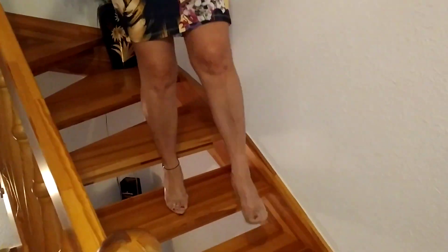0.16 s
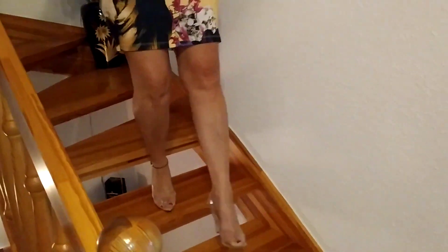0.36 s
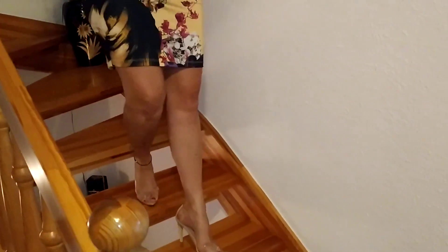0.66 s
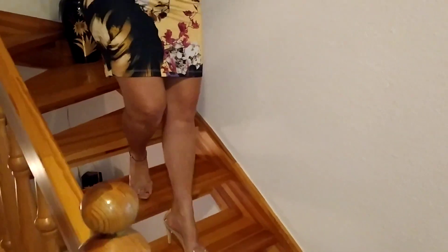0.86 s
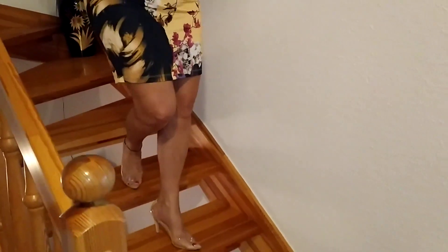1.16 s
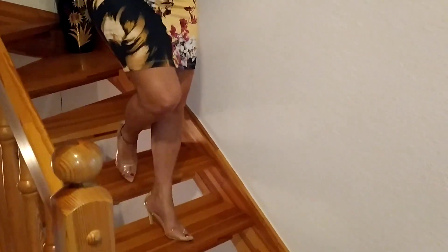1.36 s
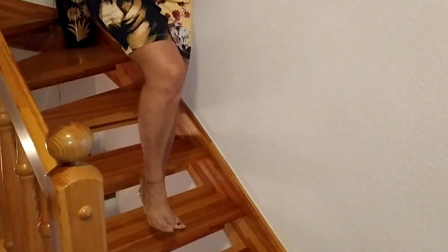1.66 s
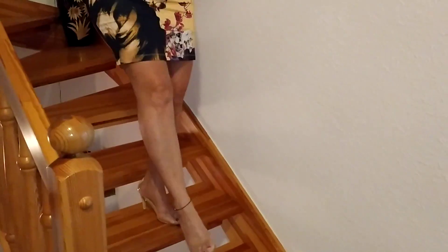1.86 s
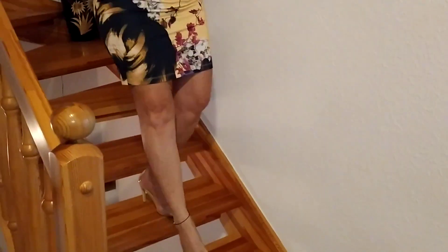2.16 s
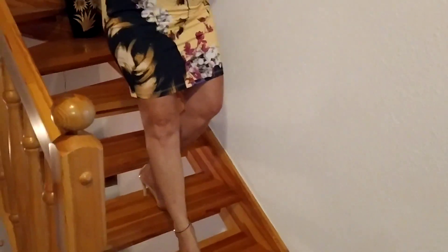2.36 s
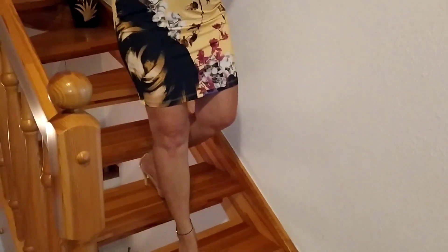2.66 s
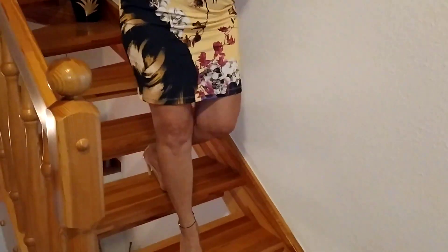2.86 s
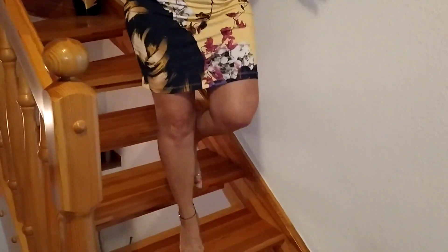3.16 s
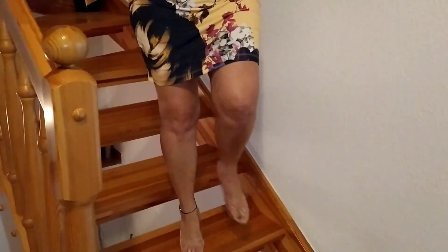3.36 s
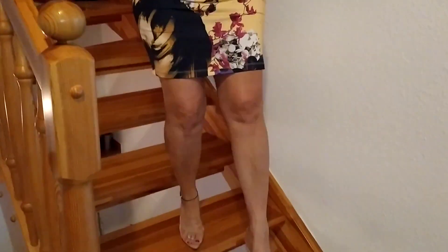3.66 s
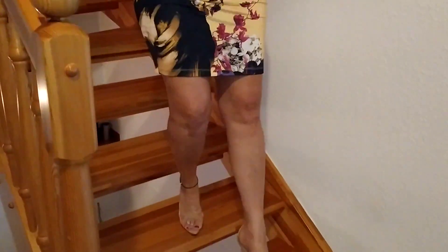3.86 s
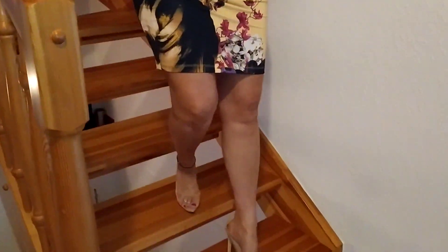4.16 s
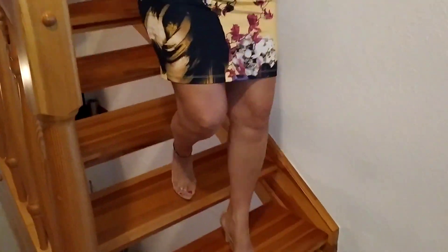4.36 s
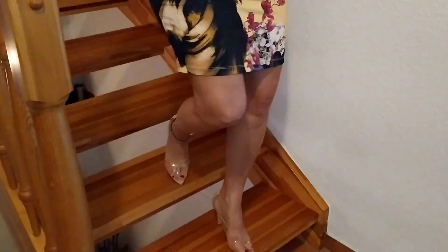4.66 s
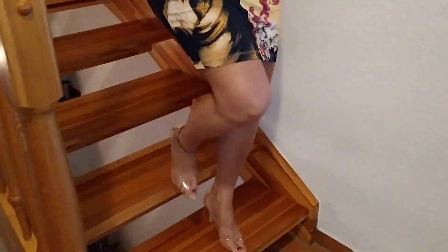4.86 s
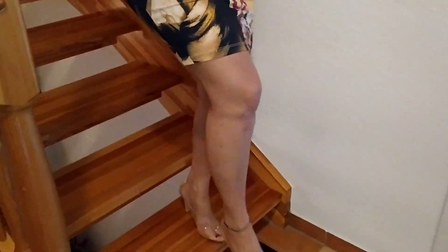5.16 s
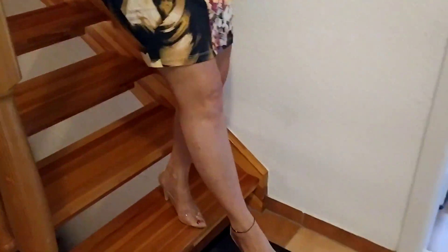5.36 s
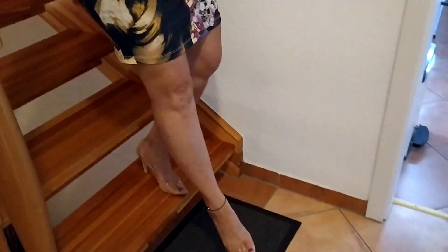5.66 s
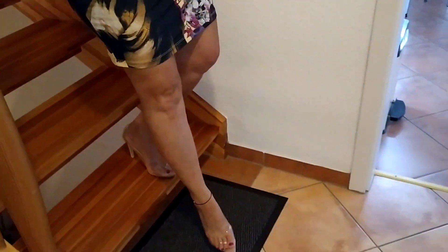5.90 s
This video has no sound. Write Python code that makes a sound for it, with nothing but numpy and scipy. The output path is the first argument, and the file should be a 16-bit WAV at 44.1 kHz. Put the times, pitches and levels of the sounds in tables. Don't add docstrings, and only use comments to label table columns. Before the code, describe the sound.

Inside a bare house stairwell, quiet microphone hiss and a wavering low rumble continue throughout, with faint cloth rustle and creaky handling. A soft finger thump at 0.25 s and slight strap scuffs lead to the first step around 0.97-1.05 s: a sole slap and hollow double heel knock on wood, with small rebounds and about half a second of echo. A light tick follows at 1.2 s, then a sharp finger pop on the left at 1.74 s. The second step, at 2.72 s, is a brighter slap and knock, with softer contacts until 2.94 s. Faint taps and handling pops pass between 3.1 and 4.2 s. The third step is loudest, a sharp slap at 4.39 s and hard heel clack at 4.44 s, rattling briefly as the tread rings. Only faint touches follow around 5.1 s, before close left-side finger pops crowd 5.64-5.95 s.

```python
import sys
import numpy as np
from scipy import signal
from scipy.fft import rfft, irfft
from scipy.io import wavfile
from scipy.ndimage import uniform_filter1d

SR = 44100
rng = np.random.default_rng(int(sys.argv[2]) if len(sys.argv) > 2 else 0)


def wav_out(sig):
    wavfile.write(sys.argv[1], SR, np.round(np.clip(np.atleast_2d(sig).T, -1, 1) * 32767).astype(np.int16))


def linear_from_db(decibels):
    return 10 ** (np.asarray(decibels, float) / 20)


N = 266011

# pitch_hz, level_db per Hz
HISS_SPECTRUM = [(53, -44), (90, -4.5), (136, -11.5), (410, -19.5), (532, -21), (1290, -24), (1540, -26.5),
                 (2090, -21.5), (2800, -24), (3300, -30), (4860, -29), (5410, -30.5), (10600, -30),
                 (16000, -36)]
# pitch_hz, likeness (-1 to 1)
HISS_LIKENESS = [(60, -0.38), (180, 0.55), (550, 0.73), (1650, 0.01), (4970, -0.01), (15000, -0.023)]
# centre_s, rise_db, length_s
SHUFFLE_SWELLS = [
    (.23, 0, 0.11),
    (1.25, 5, 0.26),
    (2.7, -5, 0.045),
    (2.85, 13, 0.1),
    (3.49, 0.5, 0.14),
    (4.2, 7.5, 0.26),
    (4.82, 4.5, 0.021),
    (5.16, 6, .06),
    (5.73, 6, 0.17),
]
# centre_s, rise_db, length_s
GRIP_SWELLS = [(.55, -4.5, .12), (.86, 7.5, 0.12), (1.1, -34, 0.033), (1.22, 12, .08), (2.4, 8, 0.36),
               (2.88, 16, 0.074), (3.3, -2, 0.33), (4.38, -11.5, 0.088), (4.57, 19, 0.15), (4.95, -3, 0.19),
               (6.03, -2, 0.059)]

# time_s, pitch_hz
HUM_PITCH = [(0, 60.6), (.43, 53.3), (.7, 58.1), (.9, 43.9), (1.1, 52.64), (1.9, 56.1), (2.6, 55.7),
             (3.07, 66.13), (5.3, 64.8), (6.03, 52.4)]
# centre_s, rise_db, length_s
HUM_SURGES = [(0, 15, 0.037), (.25, 4, 0.053), (.42, 4.5, 0.02), (.66, 2, 0.053), (.9, 12.5, 0.068),
              (1.15, 16.5, 0.063), (1.67, 4.5, 0.096), (1.9, 3.5, 0.19), (2.6, 4, 0.045),
              (2.79, 12.5, 0.025), (2.96, 8, 0.056), (3.4, 4.5, 0.31), (3.82, -7, 0.044), (4.0, 3.5, 0.044),
              (4.25, 3, 0.043), (4.44, 6, 0.07), (4.6, 1, 0.044), (4.82, 7, 0.047), (5.07, 5.5, 0.14),
              (5.55, 14.5, 0.071), (5.84, 6, 0.045), (6.03, 7, 0.032)]
# centre_s, left_minus_right_db, length_s
HUM_TILTS = [(0, -6, 0.03), (.33, 9, 0.084), (1.1, -4, 0.038), (1.35, 16, 0.087), (1.68, 2, 0.048),
             (2.24, 21, 0.045), (2.6, 13, 0.059), (3.9, 11, 0.033), (4.5, -9, 0.18), (5.5, -3, .1),
             (5.83, 2, 0.047)]

# start_s, level_db, contact_ms, after_push_ms, echo_db
STEP_BLOWS = [(.048, -66.5, 0.44, 4.2, -4), (.369, -56.5, 0.17, 9.4, -4), (.745, -48.5, 0.13, 11, -2),
              (0.963, -51, 0.26, 1.4, 2), (.977, -33.5, 0.033, 7.9, -4), (1.032, -26, 0.085, 7.5, 2.5),
              (1.0371, -25, 0.34, 1.7, -16.5), (2.725, -33, 0.055, 15, -2.5),
              (2.846, -42.5, 0.76, 6.5, -0.5), (2.858, -40, 0.18, 2.8, -10), (2.936, -45.5, 0.33, 5.5, 1.5),
              (3.147, -59.5, 0.063, 4.6, 7), (3.869, -55, 0.59, 3.1, -8), (3.98, -51, 0.04, 5.2, -2),
              (4.097, -51, 0.27, 7.4, 3.5), (4.345, -51, 0.06, 1.5, -2), (4.387, -27, 0.061, 15, -8.5),
              (4.4394, -22.5, 0.12, 6, 0.5), (4.4467, -22.5, 0.17, 7.1, -40), (5.095, -56, 0.4, 1.8, -7),
              (5.174, -62, 0.23, 9.9, 7)]
# start_s, level_db, contact_ms,
# after_push_ms, echo_db (unused, these stay dry)
AFTER_KNOCKS = [(1.0435, -27.5, 0.13, 3.6, 0), (2.729, -40, 1.9, 8.4, 0), (2.873, -43.5, 1., 6, 0),
                (4.4425, -21, 0.066, 5.7, 0), (4.4498, -28, 0.34, 3, 0), (4.469, -29, 0.46, 6.4, 0),
                (4.486, -31, 0.42, 6, 0), (5.2, -69, 0.17, 15, 0), (1.107, -39, .45, 18, 0),
                (1.18, -46.5, 0.29, 19, 0), (2.731, -35, 0.12, 5, 1), (2.7378, -39, 0.072, 2.5, 0),
                (4.512, -36, 0.42, 16, 0), (4.536, -33, .55, 18, 0)]
LANDING_CHANGES = [
    2.0,
    2.84,
    2.9,
    3.5,
    4.43,
    4.6,
]
# pitch_hz, width_hz, level_db
UPPER_TREAD = [(142, 97, -7), (212, 73, 1.5), (315, 18, -11), (441, 22, -1), (540, 67, -9.5),
               (613, 25, -10), (770, 75, -5.5), (956, 94, -5.5), (1150, 220, -5.5), (1440, 210, -13)]
MIDDLE_TREAD = [(136, 50, -8.5), (230, 71, -7), (290, 80, -16), (439, 37, -8.5), (642, 128, -2),
                (940, 105, 0.5), (1390, 300, 0.5), (1810, 300, 4), (2500, 400, -14)]
LOWER_TREAD = [(135, 24, -11), (226.7, 50, 3.5), (305, 34, -13), (438, 23, 1.5), (486, 46, 1),
               (640, 65, -3.5), (778, 40, -0.5), (900, 100, 1), (1164, 72, 3.5), (1484, 150, 6),
               (1732, 201, -27)]
# pitch_hz, width_hz, level_db
MIDDLE_TREAD_HEEL = [(140, 60, -10), (252, 84, 1), (340, 100, -3), (432, 40, -2.5), (610, 100, 6),
                     (760, 110, 1), (1000, 200, -10)]
LOWER_TREAD_HEEL = [(140, 28, -15), (239, 43, -4), (313, 31, -11.5), (354, 30, -11.5), (422, 26, -6.5),
                    (483, 61, 1), (620, 92, -4), (770, 95, 1), (900, 110, -17), (1118, 39, -9.5),
                    (1280, 87, -15), (1430, 84, -8), (1630, 100, -11), (2600, 600, -11)]

# pitch_hz, t60_s
STAIRWELL_T60 = [(100, 0.5), (400, 0.52), (1100, 0.48), (3000, 0.39), (8000, 0.47), (15000, 0.19)]
# pitch_hz, likeness (-1 to 1)
ECHO_LIKENESS = [(60, 1), (180, 0.99), (550, 0.75), (1650, 0.27), (4970, 0), (15000, 0.47)]

# start_s, level_db, pitch_hz, width_octaves, length_ms
SHOE_SLAPS = [(.742, -48, 2500, 1.5, 4.8), (0.9653, -32, 5000, 2.8, 0.66), (0.9728, -30.5, 1910, 1.96, 4.4),
              (1.03, -51, 845, 0.35, 5.1), (1.182, -31, 10700, 0.78, 1.9), (2.175, -50.5, 9000, 4.1, 10.2),
              (2.7245, -31, 2560, 0.25, 2.56), (2.724, -27, 5200, 2.4, 5.8), (2.937, -36, 2560, 1.7, 3.9),
              (3.147, -52.5, 2020, 1.3, 4.6), (3.981, -42.5, 4000, 2.1, 7.5),
              (4.097, -41.5, 2983, 2.4, 7.4), (4.2092, -39, 10500, 0.93, 3.6), (4.386, -18.5, 3000, 2.7, 2),
              (4.4396, -28, 2500, 0.35, 1.5), (4.4395, -35, 746, 0.17, 3), (4.604, -50.5, 6670, 0.69, 9.5),
              (5.17, -55.5, 850, 0.65, 23), (5.557, -51, 9000, 0.5, 2.7), (5.844, -38.5, 8150, 0.87, 2.9)]
# start_s, level_db, pitch_hz, width_octaves, length_ms
SHOE_SCUFFS = [(0.221, -48.5, 8300, 0.72, 19), (.29, -57, 9900, 0.51, 8.4), (0.349, -56, 2750, 5.1, 43),
               (.466, -50.5, 10800, 2, 34), (.67, -60.5, 4760, .51, 49), (.9, -57, 9000, 1.2, 30),
               (1.172, -53, 10670, 0.91, 9.), (2.648, -53.5, 2680, 2.5, 48), (2.779, -57, 6030, 2.5, 64),
               (3.664, -63, 3480, 0.9, 59), (4.6915, -48.5, 5974, 4.3, 18), (5.659, -57.5, 6200, 1.1, 94),
               (5.757, -47.5, 6000, 2.1, 22), (5.975, -55.5, 14250, 1.5, 39)]

# start_s, level_db, snap_ms, sign
FINGER_FLICKS = [
    (1.74062, -24, .05, -1),
    (1.74078, -17, .1, 1),
    (1.776, -44, .2, 1),
]
FINGER_PRESSES = [(.245, -27.5, 1.8, 1), (1.37, -56, .95, 1), (1.444, -33, 1.3, 1), (1.613, -31, 1, -1),
                  (1.7426, -17.5, 0.44, 1), (1.801, -24.5, 1.37, 1), (2.588, -22.5, 2.4, -1),
                  (3.226, -31.5, 0.9, -1), (3.669, -26.5, 2.4, 1), (3.871, -30, 0.85, 1),
                  (5.295, -26.5, 0.22, -1), (5.6449, -17, 0.76, -1), (5.9473, -22.5, 0.59, -1)]
FINGER_TAPS = [(5.6438, -18, 0.39, -1), (5.6443, -13.5, 0.13, 1), (5.713, -21, 1.5, -1),
               (5.75, -30, 0.37, -1), (5.7906, -18, 1.2, -1), (5.816, -30, .2, -1), (5.8285, -12, 2.2, -1),
               (5.834, -27, 0.92, 1), (5.8492, -11, 0.25, -1), (5.8498, -19, 0.18, 1),
               (5.881, -28, 0.37, -1), (5.9108, -27, 0.48, -1), (5.9352, -33, 0.32, 1),
               (5.9376, -19.5, 0.59, -1), (5.946, -22.5, 0.088, 1)]
# rounding (share of the snap), slow_share of the 4 ms tail
FLICK_SHAPE = (.3, 1.45)
PRESS_SHAPE = (0.67, 0.12)
TAP_SHAPE = (0.99, 0.016)
# start_s, level_db, pitch_hz, length_ms
FINGER_RUBS = [(1.7415, -48.5, 2160, 5.44), (1.836, -68.5, 8050, 12), (3.222, -59.5, 8900, 4.2),
               (3.238, -55, 9100, 9.2), (3.256, -60, 8000, 8.), (3.435, -65, 6000, 36),
               (3.466, -63, 9100, 26), (3.865, -58, 10700, 4), (3.889, -59.5, 10000, 13),
               (5.304, -62.5, 8810, 7), (5.507, -56, 10200, 6.3), (5.521, -58.5, 8900, 37),
               (5.631, -55.5, 8600, 14), (5.635, -54, 900, 9.), (5.829, -60, 900, 18.),
               (5.6428, -34.5, 7900, 1.46), (5.862, -68, 7000, 9.2), (5.788, -50, 7460, 2.9),
               (5.936, -57, 6800, 3.4), (5.944, -48, 6850, 1.6)]

# start_s, level_db, pitch_hz, t60_s
HEEL_CLACKS = [(.975, -43, 2240, 0.091), (.976, -47, 1045, 0.06), (1.032, -41, 790, 0.046),
               (1.032, -44, 1210, 0.037), (1.033, -47, 1520, .04), (1.045, -38, 912, .07),
               (1.128, -49, 985, .08), (2.7245, -31, 2650, .03), (2.7285, -35, 954, 0.056),
               (2.8585, -42.5, 620, 0.037), (2.938, -48, 2190, .03), (3.148, -55, 2300, 0.024),
               (4.386, -24, 2230, 0.017), (4.2095, -50, 2200, 0.016), (4.4395, -25, 2580, .022),
               (4.44, -37, 3020, .02), (4.44, -27.5, 770, 0.04), (4.441, -34, 1082, .06),
               (4.452, -31, 760, 0.066)]


def evened(x):
    return x / np.sqrt(np.mean(x ** 2) + 1e-20)


def read(points, hz):
    f, value = np.transpose(points)
    return np.interp(np.log(hz + 1), np.log(f + 1), value)


def add(mix, start_s, sound):
    part = mix[round(start_s * SR):][:len(sound)]
    part += sound[:len(part)]


def paired(a, b, same):
    same = np.clip(same, -1, 1)
    return np.array([a, same * a + np.sqrt(1 - same ** 2) * b])


def coloured(noise, hz, octaves):
    f = np.fft.rfftfreq(len(noise), 1 / SR) + 1
    bell = np.exp(-.5 * (np.log2(f / hz) / octaves) ** 2)
    return evened(irfft(rfft(noise) * bell, len(noise)))


def swells(rows, s):
    return sum(db * np.exp(-.5 * ((s - at) / max(length, .01)) ** 2) for at, db, length in rows)


def floor():
    size, hop = 1024, 256
    frames, hz = N // hop + 5, np.fft.rfftfreq(size, 1 / SR)
    a, b, c, d, patches = rng.standard_normal((frames, 513, 5)).T
    patches = uniform_filter1d(uniform_filter1d(patches, 12, 0), 14, 1)
    patches_db = 1.45 * evened(patches)
    hiss = paired(a + 1j * b, c + 1j * d, read(HISS_LIKENESS, hz)[:, None])
    hiss = hiss * linear_from_db(read(HISS_SPECTRUM, hz)[:, None] + patches_db)
    still = signal.istft(hiss[0], nperseg=size, noverlap=size - hop)[1]
    scale = linear_from_db(-68.5 + 3.0) / np.sqrt(np.mean(still ** 2))
    s = np.arange(frames) * hop / SR
    treble = read([(300, 0.29), (1500, 0.34), (4000, 0.72), (14000, 0.88)], hz)[:, None]
    bass = read([(100, 0.47), (350, 0.42), (900, 0.63), (2500, 0.11)], hz)[:, None]
    hiss = hiss * linear_from_db(treble * swells(SHUFFLE_SWELLS, s) + bass * swells(GRIP_SWELLS, s))
    return scale * signal.istft(hiss, nperseg=size, noverlap=size - hop)[1][:, :N]


def rumble():
    s = np.arange(N) / SR
    level_db = -66 + swells(HUM_SURGES, s)
    pan_db = 3 + swells(HUM_TILTS, s)
    hz = np.interp(s, *np.transpose(HUM_PITCH))
    r = np.exp(-np.pi * 24. / SR)
    slow = rng.standard_normal((2, N)) + 1j * rng.standard_normal((2, N))
    slow = paired(*slow, .6)
    for _ in range(2):
        slow = signal.lfilter([1 - r], [1, -r], slow)
    slow = slow / (abs(slow) + .5 * abs(slow).mean())
    tone = (slow * np.exp(2j * np.pi * np.cumsum(hz) / SR)).real
    return evened(tone) * linear_from_db(level_db + np.outer([.5, -.5], pan_db))


def wood_ring(modes):
    f = abs(np.fft.fftfreq(8192, 1 / SR)) + 1
    power = sum(linear_from_db(2 * db) / width ** 2 / (1 + ((f - hz ** 2 / f) / width) ** 2) for hz, width, db in modes)
    log_gain = np.log(power + 1e-14) / 2
    phase = -signal.hilbert(log_gain).imag
    return np.fft.ifft(np.exp(log_gain + 1j * phase)).real[:4096]


def blows(rows):
    t, out = np.arange(4096) / SR, np.zeros((2, N))
    landings = (UPPER_TREAD, MIDDLE_TREAD, MIDDLE_TREAD_HEEL, MIDDLE_TREAD,
                LOWER_TREAD, LOWER_TREAD_HEEL, LOWER_TREAD)
    rings = [wood_ring(modes) for modes in landings]
    grits = rng.standard_normal((len(rows), 4096))
    for (s, db, touch_ms, push_ms, echo_db), grit in zip(rows, grits):
        ring = rings[np.searchsorted(LANDING_CHANGES, s)]
        dull_hz = np.clip(220 / touch_ms, 200, 9000)
        touch = signal.lfilter(*signal.butter(2, dull_hz, fs=SR), ring)
        push = 0.11 * grit * np.exp(-t / (push_ms / 1000))
        knock = np.r_[touch, 0 * touch][:-1] + signal.fftconvolve(touch, push)
        knock = linear_from_db(db) * knock / abs(knock).max()
        add(out[0], s, knock)
        add(out[1], s, linear_from_db(echo_db) * touch * np.linalg.norm(knock) / np.linalg.norm(touch))
    return out


def stairwell(x):
    taps = np.zeros((2, SR))
    at = np.arange(130, SR - 20, 10) + rng.integers(0, 10, (2, (SR - 141) // 10))
    np.put_along_axis(taps, at, rng.choice([-1., 1.], at.shape), 1)
    hz, t, z = signal.stft(taps, SR, nperseg=512, noverlap=384)
    z = paired(*z, read(ECHO_LIKENESS, hz)[:, None])
    z = z * linear_from_db(-60 * t / read(STAIRWELL_T60, hz)[:, None])
    tail = signal.istft(z, SR, nperseg=512, noverlap=384)[1][:, :SR]
    tail = tail * np.clip((np.arange(SR) / SR - .002) / 0.0007, 0, 1)
    return signal.fftconvolve(x, tail / np.linalg.norm(tail[0]), axes=1)[:, :N]


def ticks():
    t, out = np.arange(16384) / SR, np.zeros((3, N))
    click = 1. * (np.arange(16384) == 100)
    slaps = [(*row, 0.2, True) for row in SHOE_SLAPS]
    scuffs = [(*row, 0.093, False) for row in SHOE_SCUFFS]
    rows = sorted(slaps + scuffs)
    grits = rng.standard_normal((len(rows), 2, 16384))
    for (s, db, hz, octaves, ms, rise, sudden), pair in zip(rows, grits):
        length_s = ms / 1000
        shape = linear_from_db(db - 5.0) * np.exp(-t / length_s) * np.minimum(t / (rise * length_s), 1)
        left, right = (shape * coloured(noise, hz, octaves) for noise in paired(*pair, 0.23))
        even = coloured(click, hz, octaves) * (t < .1) * np.sqrt(np.mean(shape ** 2))
        for port, sound in zip(out, (left, right, even if sudden else left)):
            add(port, s, sound)
    return signal.lfilter(*signal.butter(1, 9000., fs=SR), out)


def fingers():
    t, pops, rubs = np.arange(4096) / SR, np.zeros(N), np.zeros(N)
    kinds = ((FINGER_FLICKS, FLICK_SHAPE), (FINGER_PRESSES, PRESS_SHAPE), (FINGER_TAPS, TAP_SHAPE))
    touches = [(*row, *shape) for rows, shape in kinds for row in rows]
    for s, db, ms, sign, rounded, slow in touches:
        u = t / (ms / 1000)
        tail = slow * min(ms / .1, 1) ** 3 * np.exp(-t / .004)
        push = (np.exp(-u) + tail) * (1 - np.exp(-u / rounded)) ** 2
        add(pops, s, np.sign(sign) * linear_from_db(db) * push)
    noises = rng.standard_normal((len(FINGER_RUBS), 2, 4096))
    for (s, db, hz, ms), (noise, clump) in zip(FINGER_RUBS, noises):
        clumps = linear_from_db(7.95 * np.minimum(evened(uniform_filter1d(clump, 80)), 1.2))
        stroke = np.sin(np.pi * np.clip(t / (ms / 1000), 0, 1)) ** .5
        add(rubs, s, linear_from_db(db) * coloured(noise, hz, 0.52) * clumps * stroke)
    low_cut = signal.cheby1(3, 5.0, 56., "high", fs=SR, output="sos")
    skin = signal.butter(8, 6700., fs=SR, output="sos")
    pops = signal.sosfilt(np.vstack([low_cut, skin]), pops)
    return (pops + rubs) * linear_from_db([[0], [-32]])


def clacks():
    t, out = np.arange(4096) / SR, np.zeros(N)
    for s, db, hz, t60 in HEEL_CLACKS:
        dying = linear_from_db(db - 60 * t / t60) * np.minimum(t / 0.00089, 1)
        add(out, s, dying * np.sin(2 * np.pi * hz * t))
    return out


def scene():
    wood, wood_room = blows(STEP_BLOWS)
    *shoe, shoe_room = ticks()
    echo = stairwell((linear_from_db(3.0) * wood_room + linear_from_db(0.5) * shoe_room)[None])
    near = fingers() + floor() + rumble()
    wood = wood + blows(AFTER_KNOCKS)[0] + clacks()
    wood = np.array([np.roll(wood, 6), wood])
    return wood + shoe * linear_from_db([[-1.3], [1.3]]) + echo * linear_from_db([[-.6], [.6]]) + near


def thinned(x):
    hz, t, z = signal.stft(x, SR, nperseg=1024, noverlap=768)
    gaps = uniform_filter1d(rng.standard_normal(z.shape[1:]), size=3, axis=0)
    gaps = evened(uniform_filter1d(gaps, size=16, axis=1))
    depth_db = read([(2000, 1.), (4000, 10.), (10000, 12.), (14000, 20.)], hz)[:, None]
    gaps_db = -depth_db * np.clip(gaps - .45, 0, 1.5)
    level = uniform_filter1d(abs(z).mean(0), size=30, axis=0)
    usual = np.median(level, axis=1, keepdims=True)
    gaps_db = gaps_db * np.clip(2 - level / (3 * usual + 1e-12), 0, 1)
    return signal.istft(z * linear_from_db(gaps_db), SR, nperseg=1024, noverlap=768)[1][:, :N]


def roll_off(x):
    return signal.sosfilt(signal.butter(12, 16480, fs=SR, output="sos"), x)


def record(dry):
    low_cut = signal.sosfilt(signal.butter(2, 33., "high", fs=SR, output="sos"), dry)
    edge_hz = 15830
    edge = signal.firwin2(511, [0, edge_hz - 100, edge_hz + 100, SR / 2], [1, 1, .05, .05], fs=SR)
    limited = signal.oaconvolve(thinned(low_cut), edge[None], "same")
    return roll_off(limited)


dry = scene()
out = record(dry)
wav_out(out)
```